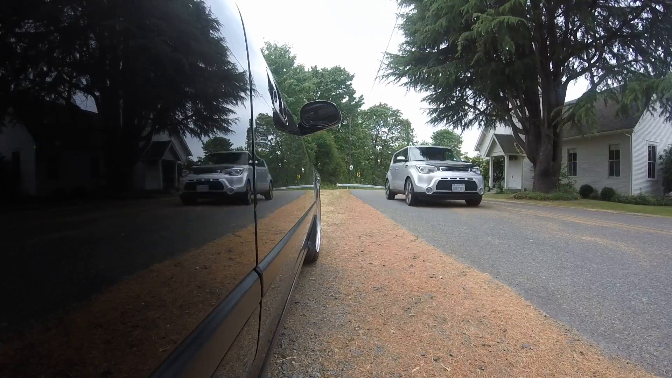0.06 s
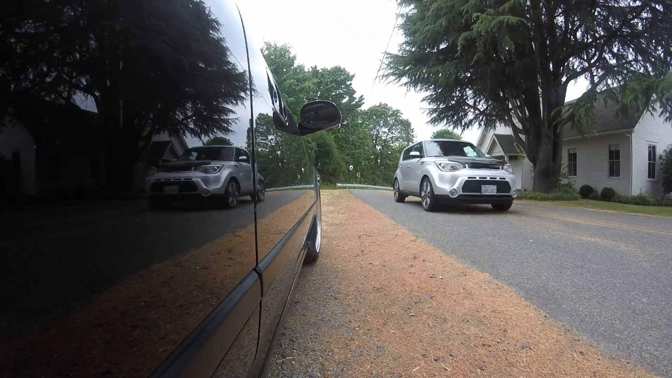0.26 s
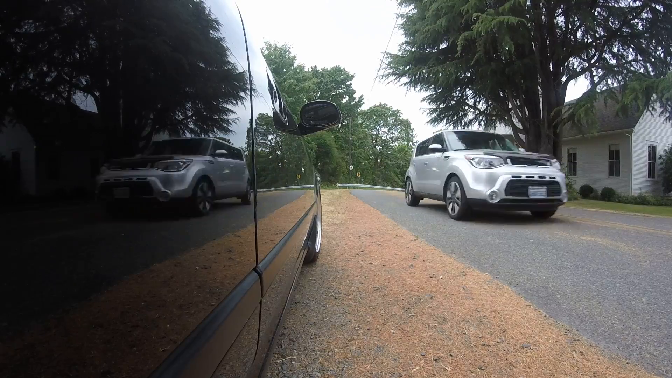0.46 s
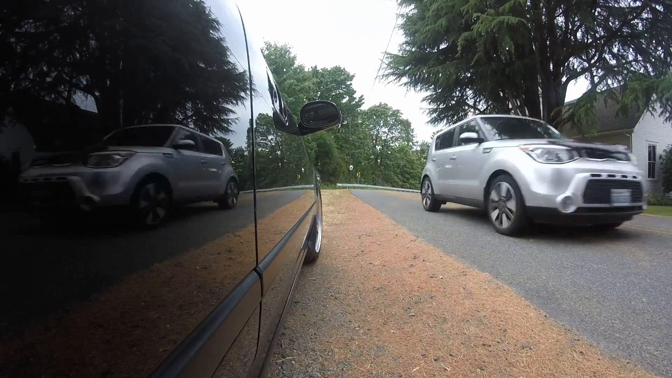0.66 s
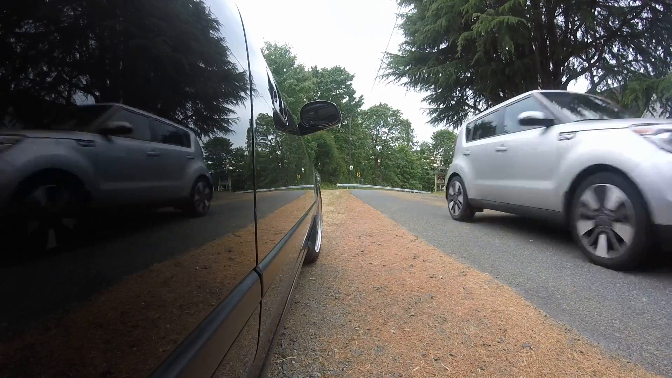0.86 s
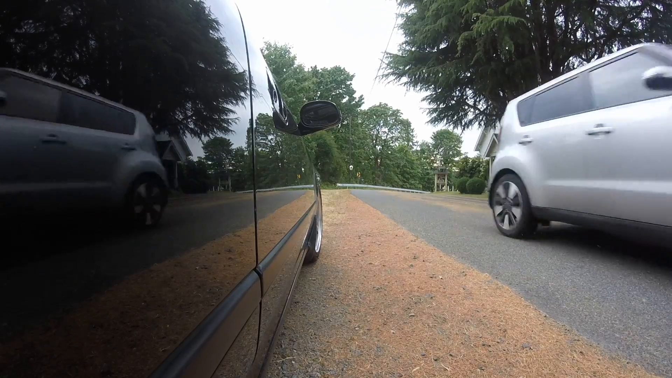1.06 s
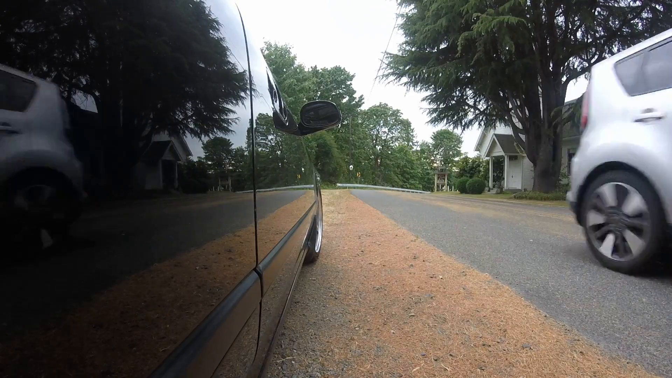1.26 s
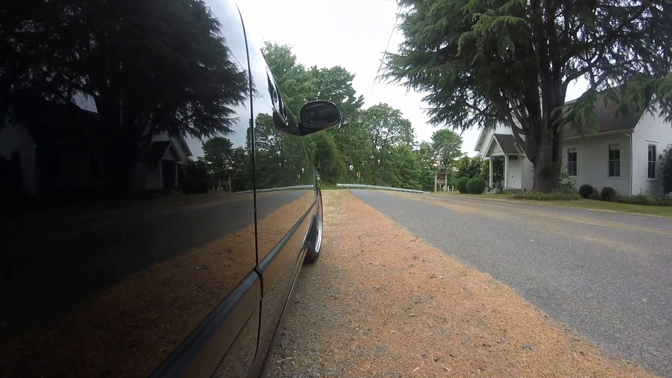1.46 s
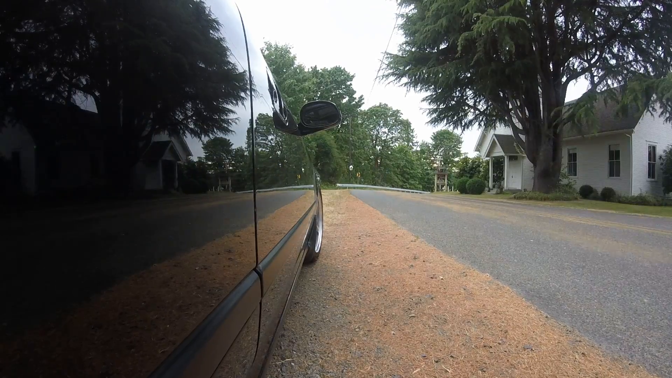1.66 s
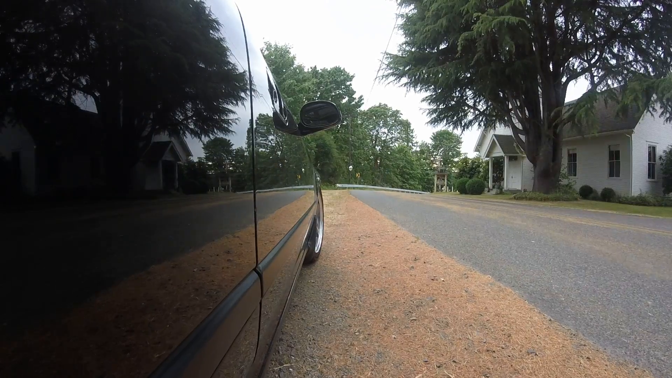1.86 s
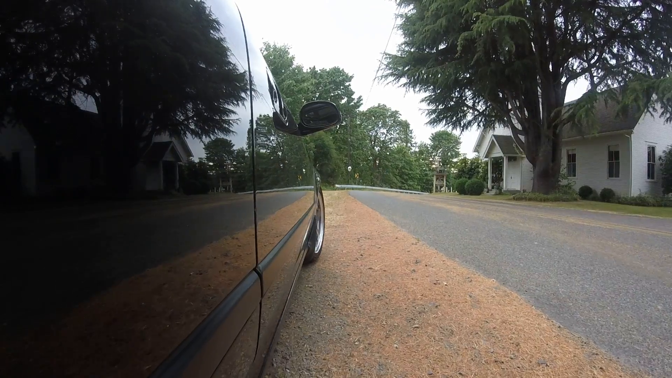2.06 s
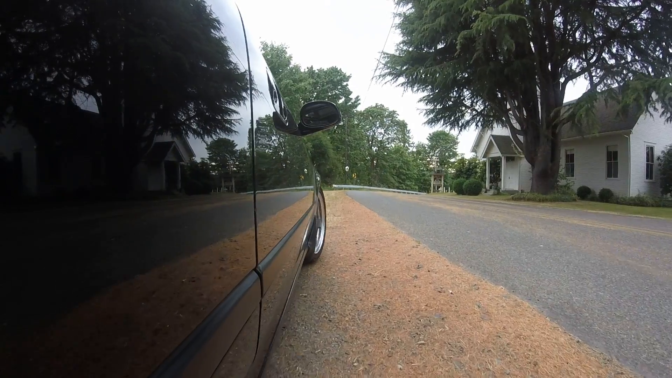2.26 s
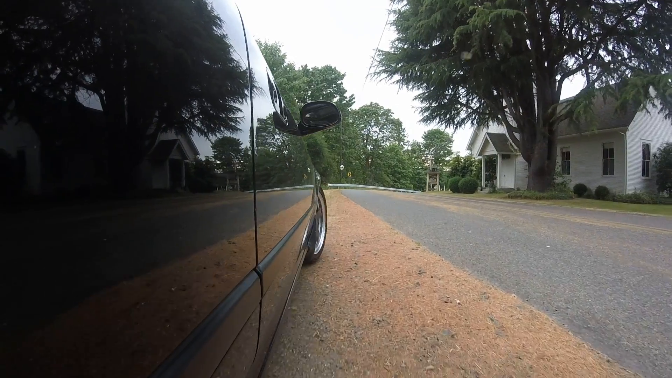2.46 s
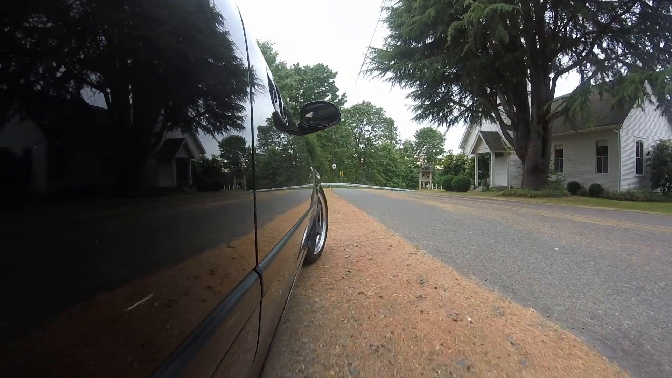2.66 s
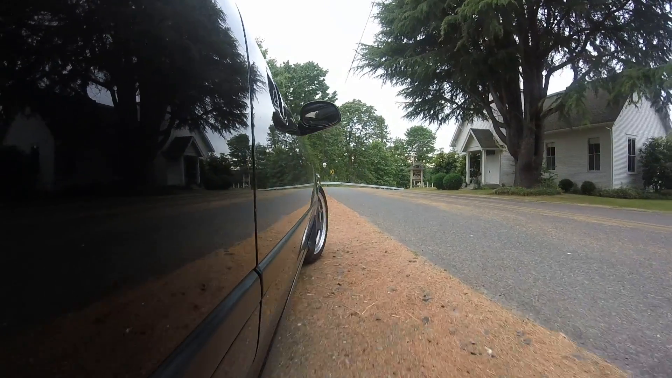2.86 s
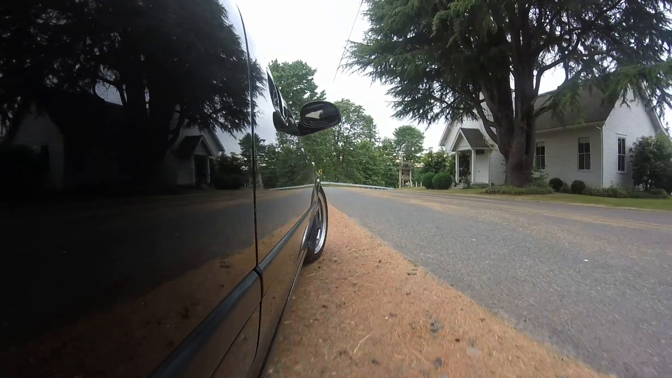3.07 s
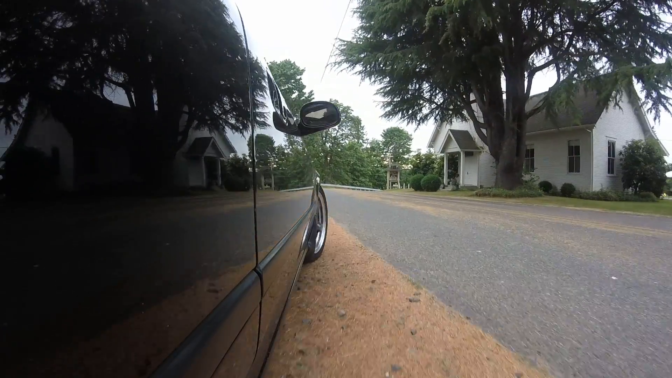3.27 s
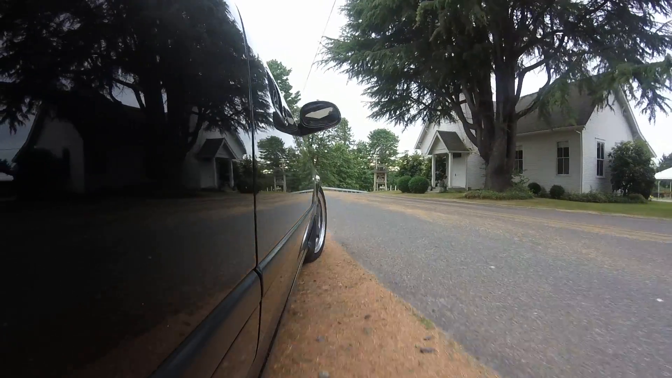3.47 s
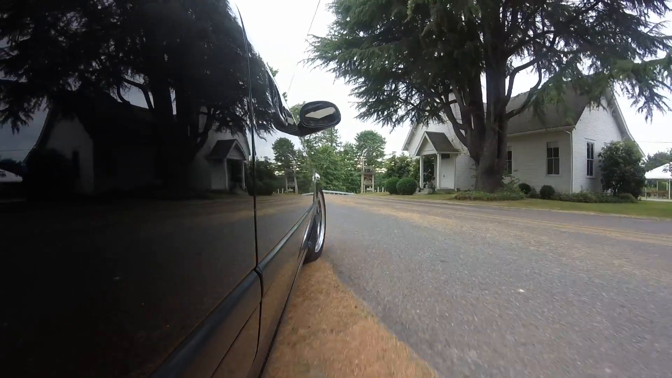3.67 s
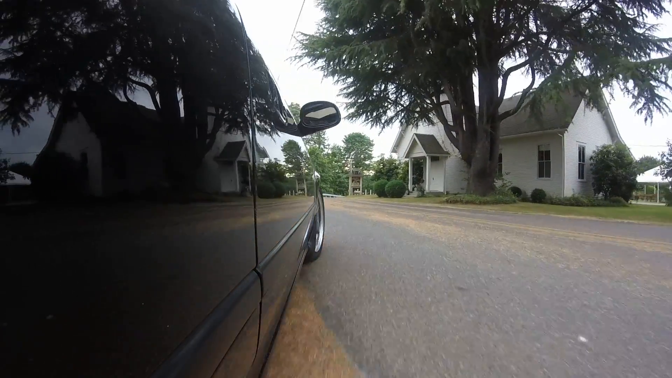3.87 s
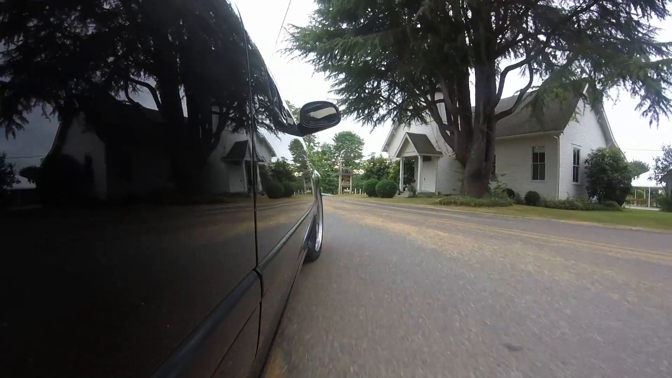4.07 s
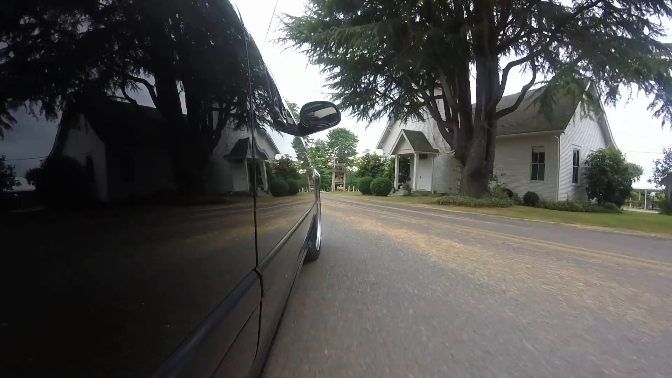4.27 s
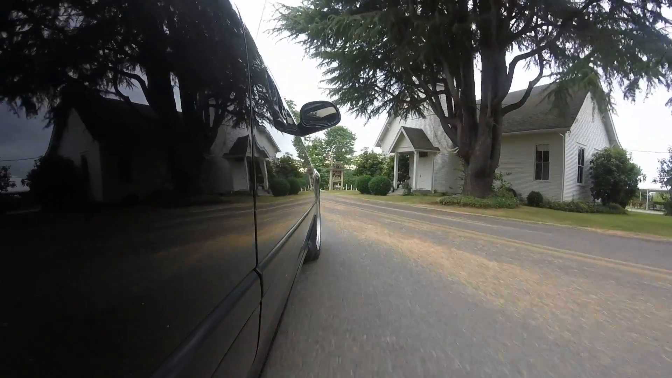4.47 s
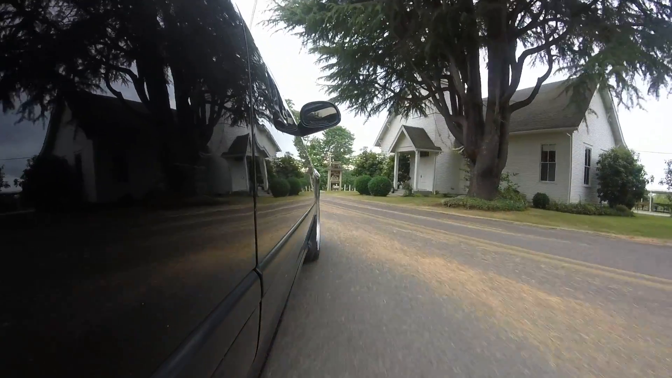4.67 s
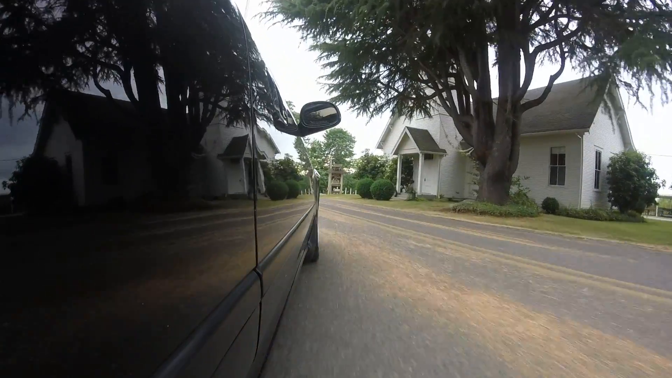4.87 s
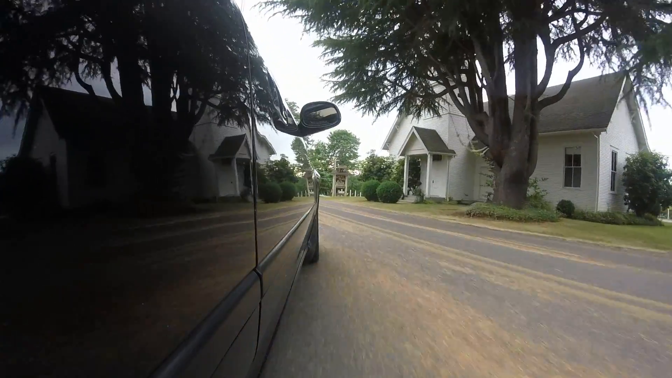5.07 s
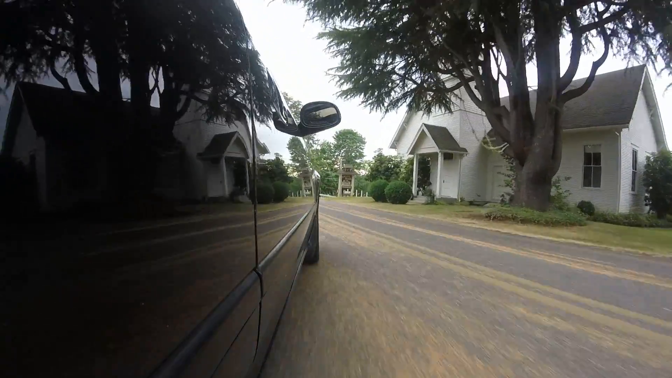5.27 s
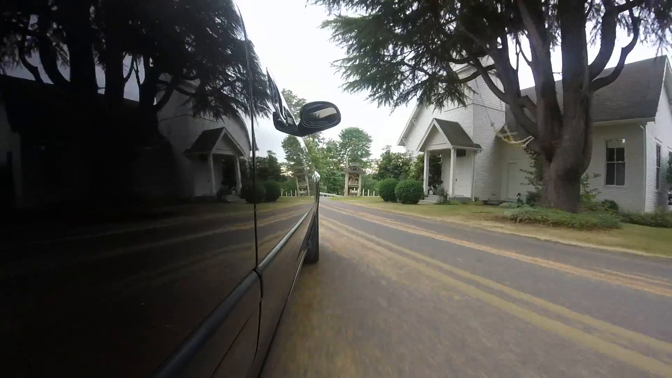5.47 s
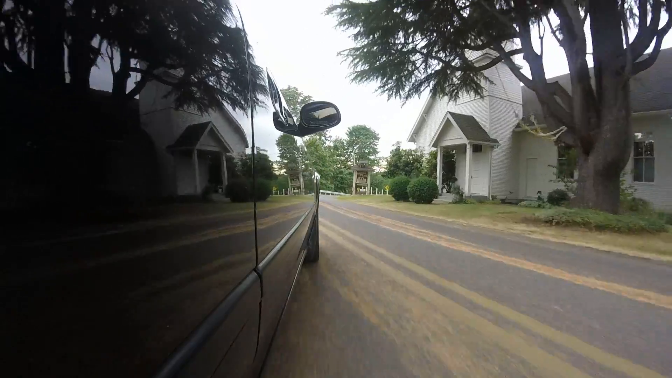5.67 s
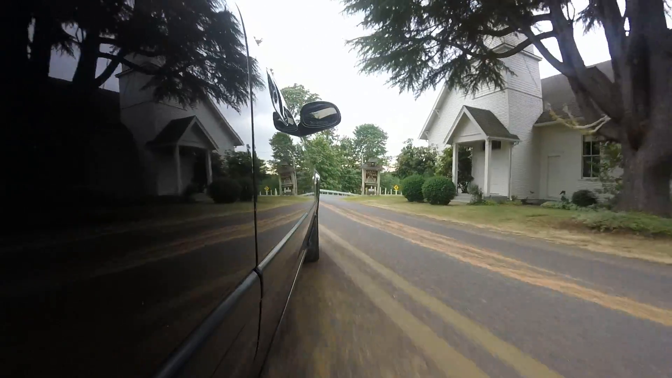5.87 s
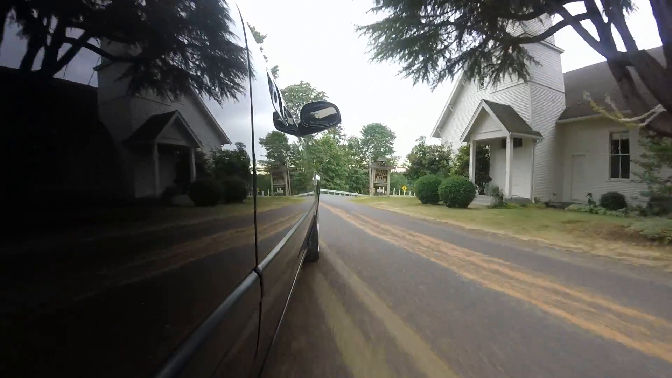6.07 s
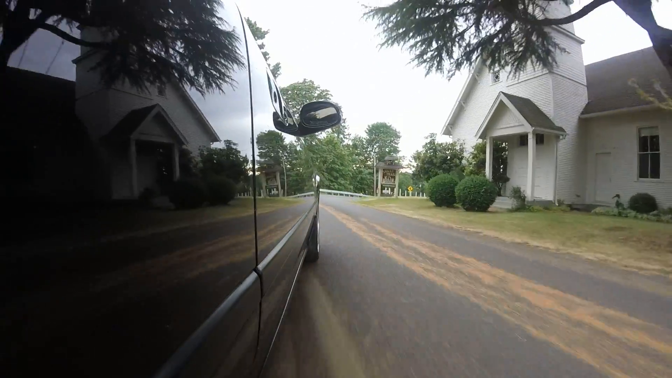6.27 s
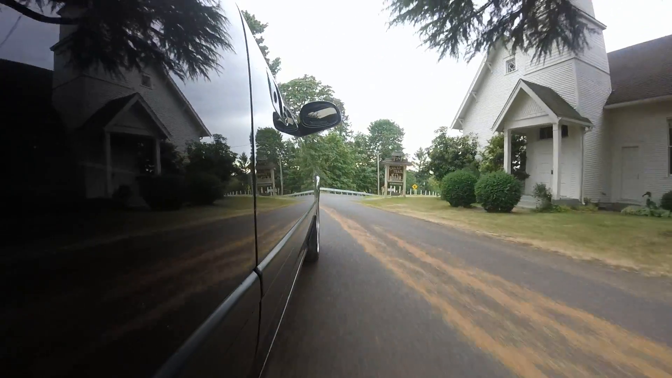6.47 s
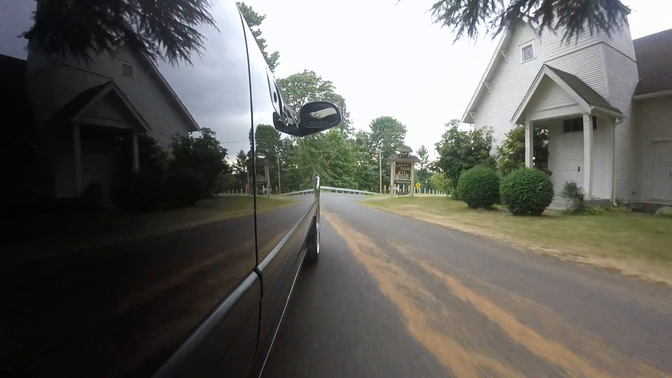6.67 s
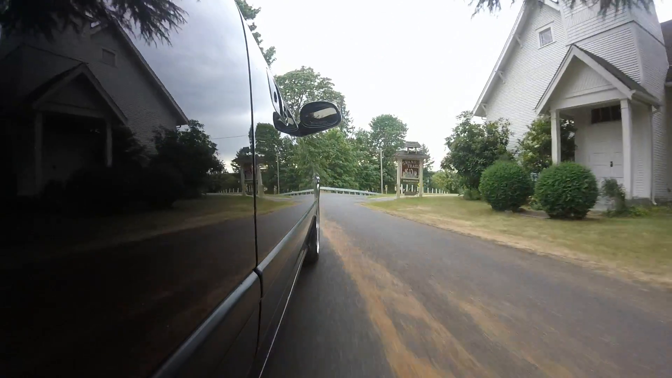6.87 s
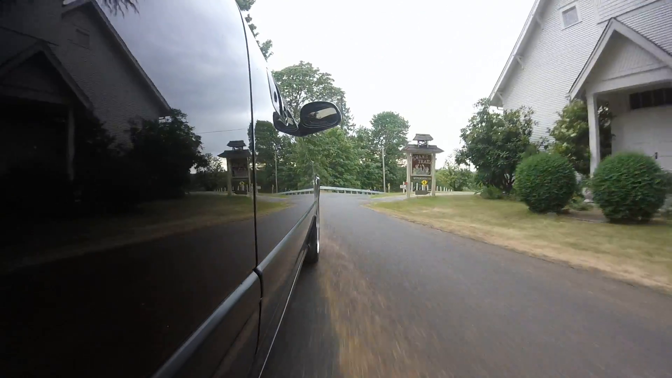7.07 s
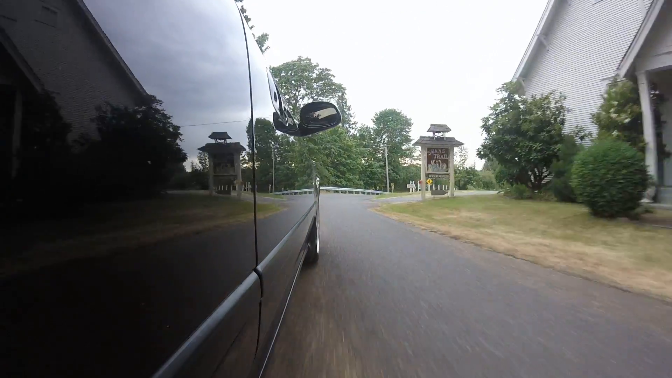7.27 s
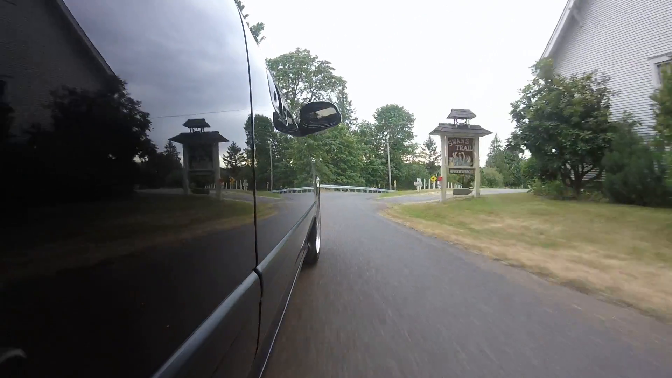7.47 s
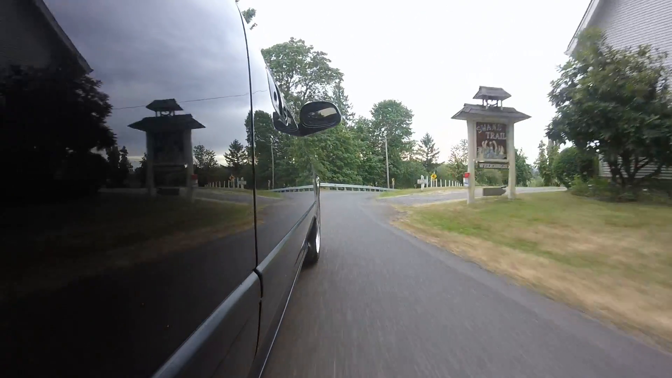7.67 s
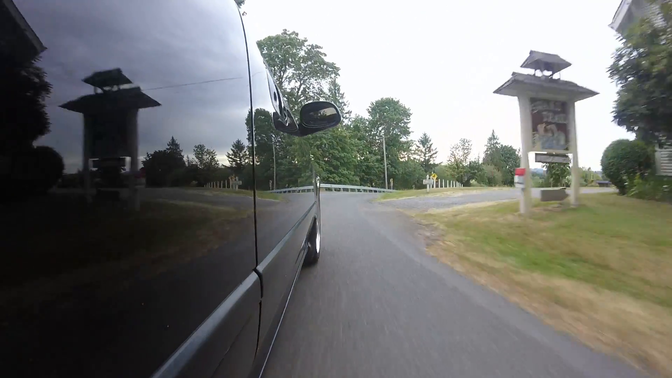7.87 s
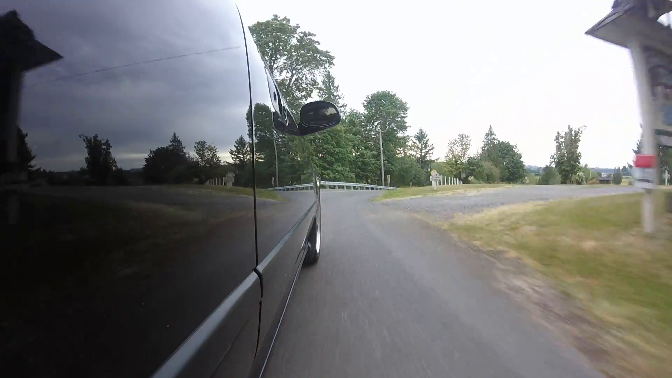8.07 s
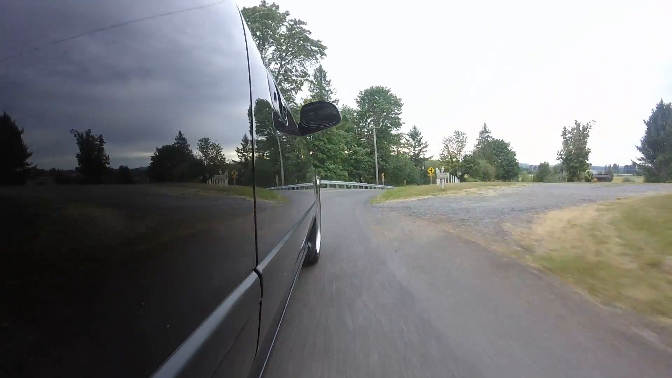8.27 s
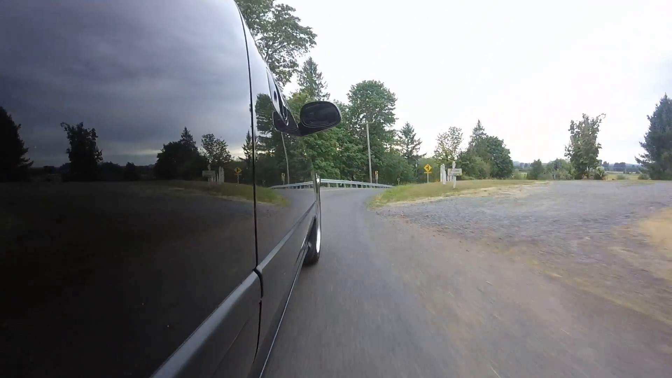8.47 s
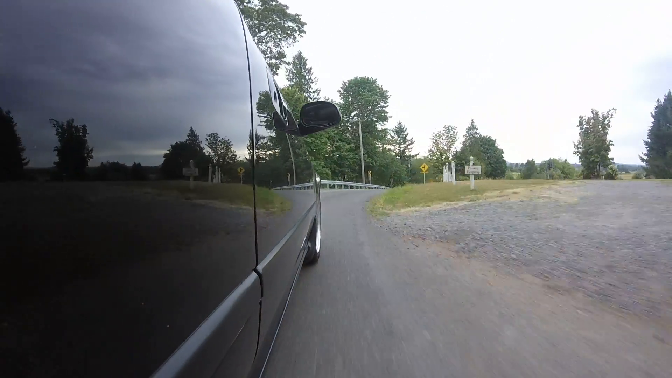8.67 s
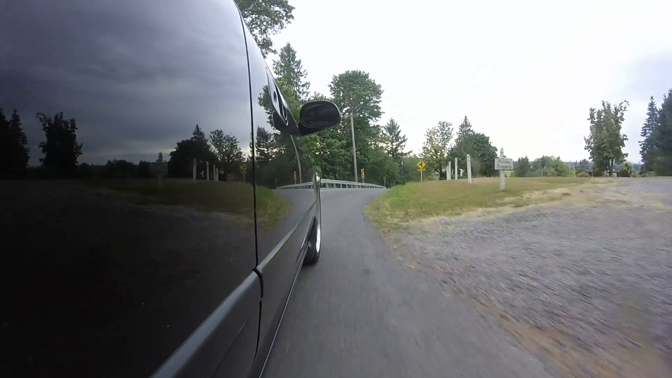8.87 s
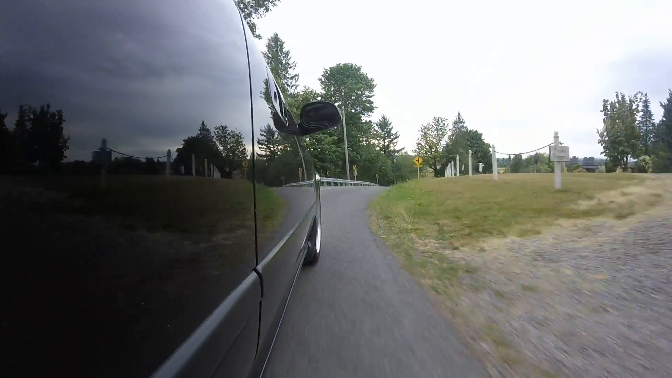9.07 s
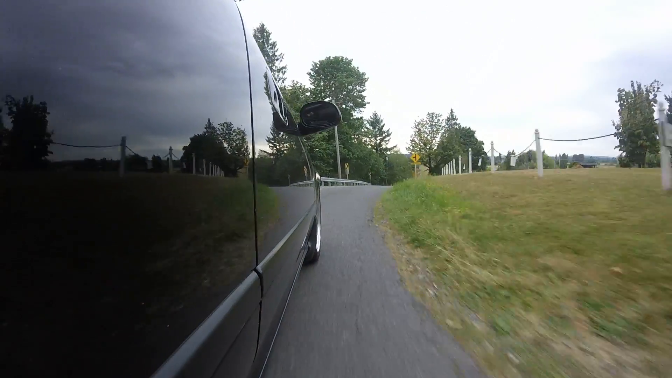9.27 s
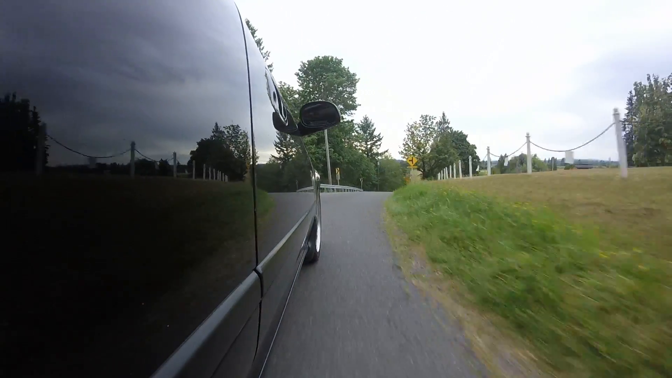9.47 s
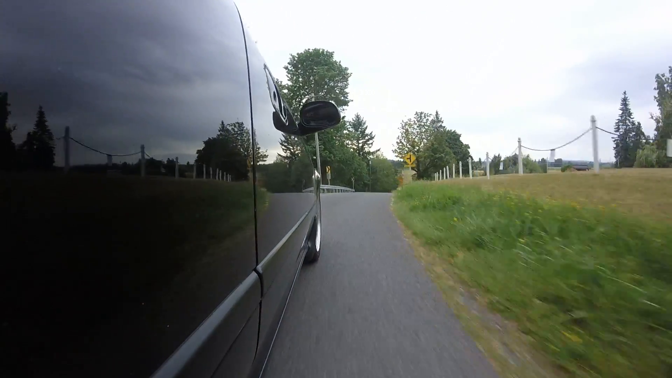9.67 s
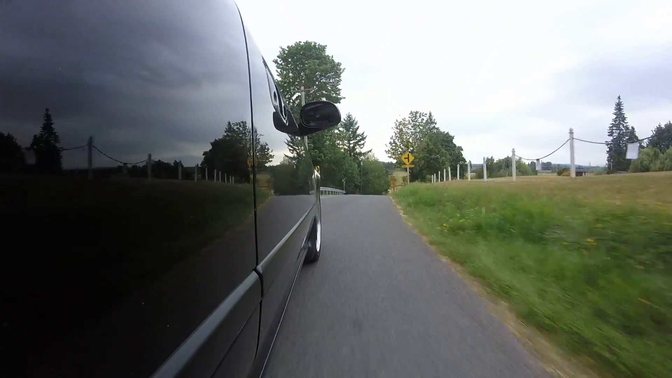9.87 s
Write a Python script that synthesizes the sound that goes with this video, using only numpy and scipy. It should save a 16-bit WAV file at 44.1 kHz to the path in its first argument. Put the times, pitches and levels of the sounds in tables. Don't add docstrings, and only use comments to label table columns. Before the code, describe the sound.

A quiet four-cylinder idle shakes a sealed case fixed to the car body while another vehicle rolls by. A quick rev follows, then slow gravelly rolling with small ringing ticks and faint whistling. The car accelerates hard, its drone swelling through panel resonances to a brief howl; the throttle lifts and wind, snaps and rattle remain over a lower hum.

```python
import sys
import numpy as np
from scipy import signal
from scipy.fft import rfft, irfft
from scipy.io import wavfile
from scipy.ndimage import uniform_filter1d, minimum_filter1d

SR = 44100
rng = np.random.default_rng(int(sys.argv[2]) if len(sys.argv) > 2 else 0)


def voltage_ratio(level):
    return 10 ** (np.asarray(level, float) / 20)


def persist_wave(psi):
    counts = np.round(np.clip(psi, -1, 1) * 32767).astype(np.int16)
    wavfile.write(sys.argv[1], SR, np.atleast_2d(counts).T)


N = 437472
TIME = np.arange(N) / SR
SLOW = np.arange(0, N, 64)


def evened(x):
    return x / np.sqrt(np.mean(x ** 2) + 1e-20)


def along(table):
    s, *columns = np.transpose(table)
    return [np.interp(TIME, s, c) for c in columns]


def coloured(x, points):
    f, db = np.transpose(points)
    hz = np.fft.rfftfreq(len(x), 1 / SR)
    curve_db = np.interp(np.log(hz + 1), np.log(f + 1), db)
    return irfft(rfft(x) * voltage_ratio(curve_db), len(x))


def band_rms(x, lo, hi):
    z = rfft(x)[int(lo * len(x) / SR):int(hi * len(x) / SR)]
    return np.sqrt(2 * np.sum(abs(z) ** 2)) / len(x)


def response(modes, hz):
    return np.sqrt(sum(voltage_ratio(2 * db) / (1 + (2 * (hz - f) / w) ** 2) ** 1.616 for f, w, db in modes))


def null(hz, null_hz, width):
    return 1 - 0.88 / (1 + (2 * (hz - null_hz) / width) ** 2)


def rung(modes):
    return irfft(rfft(rng.standard_normal(N)) * response(modes, np.fft.rfftfreq(N, 1 / SR)), N)


def drift(per_s, size=1):
    steps = rng.standard_normal(int(per_s * N / SR) + 2)
    return np.interp(np.arange(0, N, size) * per_s / SR, np.arange(len(steps)), steps)


def patchy(patch_db):
    a, b, patches = rng.standard_normal((N // 128 + 5, 257, 3)).T
    patches = uniform_filter1d(patches, size=6, axis=0)
    patches = evened(uniform_filter1d(patches, size=16, axis=1))
    return signal.istft((a + 1j * b) * voltage_ratio(patch_db * patches), nperseg=512, noverlap=384)[1][:N]


# time in seconds, firings per second in Hz.
REVS = [(0, 26.87), (1.25, 28.82), (1.43, 36.97), (1.78, 66.3), (1.93, 73.3), (2.12, 71.4), (2.4, 54.48),
        (2.6, 51.67), (2.92, 55), (3.42, 45.49), (3.67, 38.67), (3.92, 44.2), (5.06, 59.51), (5.62, 80.2),
        (6.46, 104.1), (6.8, 116.9), (7.98, 178.6), (8.12, 181.2)]
LIFT_S = REVS[-1][0]


def revs():
    after = np.maximum(TIME - LIFT_S, 0)
    hz = along(REVS)[0] - 80 * after + 8 * after ** 2
    clutch_hz, flywheel_s = 63.3, 0.12
    caught = np.where(after > 0, np.maximum(hz, clutch_hz), hz)
    return uniform_filter1d(caught, int(flywheel_s * SR), mode="nearest")


# time in seconds, level in dB.
LOAD = [(0, -41), (1.2, -37.5), (1.38, -35.5), (1.64, -26.5), (1.74, -29), (3.5, -30), (4, -29),
        (4.5, -28.5), (5, -32), (5.3, -22.5), (6.45, -22.5), (6.75, -18.5), (7.7, -18), (8.08, -17),
        (8.2, -24.5), (8.4, -23.5), (8.7, -34.5), (9.92, -32)]


def exhaust_drive():
    return along(LOAD)[0]


# centre in Hz, width in Hz, level in dB.
PIPE = [(580, 55, -30), (805, 320, -20), (940, 94, -19), (1006, 62, -12), (1725, 180, 5.5)]


def open_pipe(hz, drive_db):
    return voltage_ratio(drive_db - drive_db.max()) * response(PIPE, hz)


# dB at -22 dB of drive and 100 Hz, share of load, dB per octave of revs.
TONES = [
    (-9, 0.044, 0.4),
    (-16, 1.31, -3.5),
    (-16, 1.15, 0),
    (-21.5, 1.44, -5),
]
# centre in Hz, width in Hz, level in dB.
BODY = [(36, 7.5, -36), (67, 31, -19.5), (87.2, 7.2, -2.5), (99.2, 9.36, 4.5), (114, 14, -20),
        (145.8, 29.5, 0), (176.7, 9.2, -14), (194.2, 49, -11), (265, 9.1, -11.5), (286, 38, -17),
        (348.2, 15, -5.5), (400, 14, -18.5), (420.5, 49, -8), (509.4, 14.25, -8)]
# centre in Hz, width in Hz.
NULLS = [(123, 7.8), (171.5, 4.9), (228, 13), (315, 10), (366, 23), (402, 9.3), (462, 18), (491, 5.5),
         (538, 13)]
OWN_NULLS = {1: [(61, 4.3)], 3: [(91, 21)], 4: [(64, 8.7), (104, 7.3)]}


def tones(hz, turns, load_db):
    f, load, out = hz[SLOW], load_db[SLOW], 0
    coasting = SLOW / SR > LIFT_S
    first = np.where(coasting, null(f, 85.3, 4), 1)
    second = uniform_filter1d(np.where(coasting, voltage_ratio(6), null(f, 169, 8)), size=60)
    for k, (db, share, octave_db) in enumerate(TONES, 1):
        path = response(BODY, k * f) * np.prod([null(k * f, *row) for row in NULLS], axis=0)
        path *= np.prod([null(f, *row) for row in OWN_NULLS.get(k, [])], axis=0)
        path = path * {1: first, 2: second}.get(k, 1) + open_pipe(k * f, load)
        size = path * voltage_ratio(db + share * load + octave_db * np.log2(f / 100))
        wobble = np.sqrt(2) * voltage_ratio(drift(30))
        tone = np.sin(2 * np.pi * (k * turns + rng.random()))
        out = out + np.interp(np.arange(N), SLOW, size) * wobble * tone
    return out


SHARES_DB = [5, -5.5, -2, 1.5, 2.5, 0.5]
# centre in Hz, width in Hz, level in dB.
PANELS = [(35, 14, -3.5), (60, 19, -11.5), (91.5, 11, 1), (146, 33, 2.5), (196, 33, -3.5), (259, 22, -6.5),
          (342.4, 27, -10), (424.3, 44, -9), (507.7, 13, -6)]
# centre in Hz, width in Hz, level in dB.
HOWL_MODES = [(1524, 48, 1.5), (1590, 84, 0.5), (1803, 47, -4)]


def engine(hz, turns, drive_db):
    out = np.zeros(N)
    f, drive = hz[SLOW], drive_db[SLOW]
    extra_db = dict(zip((.5, 1.5, 2.5, 3.5, 5, 6), SHARES_DB))
    howl_s, howl_length_s, howl_db = 7.92, 0.088, 5.5
    howl = voltage_ratio(howl_db) * np.exp(-((SLOW / SR - howl_s) / howl_length_s) ** 2)
    for k in (.5, 1.5, 2.5, 3.5, *np.arange(4.5, 13, .5)):
        uneven_db = -1.5 - 250 / f * (k > 1)
        db = drive - 1.42 * k + 2 * (k % 1) * uneven_db + extra_db.get(k, 0)
        db -= 130 / f * max(k - 6, 0)
        path = response(PANELS, k * f) + open_pipe(k * f, 0.98 * drive)
        path = path + howl * response(HOWL_MODES, k * f)
        wander_db = 2.5 * drift(9, size=64) + 2 * drift(40, size=64)
        size = np.interp(np.arange(N), SLOW, voltage_ratio(db + wander_db) * path)
        jitter = (0.4 + 0.07 * k) * drift(22)
        out += size * np.sin(2 * np.pi * (k * turns + rng.random()) + jitter)
    return out


# time in seconds, speed in metres per second.
AIR = [(0, 4.4), (.6, 5.2), (2, 5.02), (4.7, 5.9), (5.4, 7), (6.2, 6.9), (6.6, 8.02), (7.1, 8.67),
       (8, 12.25), (8.45, 14.47), (8.7, 13.64), (9.2, 14.83), (9.4, 12.34), (9.62, 15), (9.92, 15.6)]
# dB at cruise, share of air, share of load, share of revs, resting level in dB.
LAWS = [
    (-19, 0.44, 0.045, 1, -51),
    (-30, 0.5, 0.22, 0.55, -62),
    (-31.5, 0.58, 0.71, 0.55, -55),
    (-28.5, 1.173, 0.11, 0.5, -84.5),
    (-55.5, 1.03, 0.12, 0.82, -79),
]


def levels(hz, load_db):
    cruise_m_s, air_power = 14.4, 3
    air_db = 20 * air_power * np.log10(along(AIR)[0][SLOW] / cruise_m_s)
    revs_db = 20 * np.log10(hz[SLOW] / 100)
    out = []
    for db, air, load, rev, rest_db in LAWS:
        driven_db = db + air * air_db + load * load_db[SLOW] + rev * revs_db
        power = voltage_ratio(2 * driven_db) + voltage_ratio(2 * rest_db)
        out.append(np.interp(np.arange(N), SLOW, 10 * np.log10(power)))
    return out


# frequency in Hz, level in dB.
HISS = [(350, -47.5), (600, -28.5), (678, -34.5), (820, -18.5), (1090, -24.5), (1300, -15), (1620, 1.5),
        (1930, -15.5), (2220, -7), (2570, -33.5), (3770, -20), (4940, -39), (6230, -52), (6760, -36),
        (15500, -73)]


def hiss(level_db, turns):
    puffs = 1 + 0.27 * np.cos(2 * np.pi * turns)
    noise = evened(coloured(puffs * patchy(patch_db=1), HISS))
    return voltage_ratio(level_db - 3) * noise / band_rms(noise, 1300, 1900)


# frequency in Hz, level in dB.
WIND = [(350, -34.5), (600, -17), (855, -13), (1230, -7.5), (1600, 3), (1910, -6.5), (2540, 9), (2750, 0.5),
        (3070, 7), (3820, 1.5), (4680, -32), (6230, -22), (6850, -35.5), (9370, -44), (15500, -52)]


def wind(level_db):
    noise = coloured(patchy(patch_db=1) * voltage_ratio(drift(60)), WIND)
    noise += 0.23 * noise.std() * evened(rung([(2530, 48, 0)]))
    return voltage_ratio(level_db) * noise / band_rms(noise, 2200, 4200)


def flecks(wind_db):
    gusts = voltage_ratio(5 * drift(90) + 1.5 * drift(18))
    level_db = -43 + 1.2 * (wind_db - wind_db.max())
    return voltage_ratio(level_db) * evened(gusts * rung([(6135, 310, 0)]))


# frequency in Hz, level in dB.
BUZZ = [(1060, -28), (1800, -2.5), (2260, -5.5), (2520, -13), (2970, -1.5), (3930, -5), (6080, -11.5),
        (6900, -14), (8700, -13.5), (11000, -27), (15800, -43.5)]


def plastic(noise):
    return coloured(noise, BUZZ)


# start in seconds, end in seconds, level in dB.
CHATTERS = [(6.315, 6.512, -52), (6.516, 6.537, -53), (8.135, 8.33, -53), (8.88, 8.888, -42.5),
            (9.089, 9.107, -51), (9.237, 9.335, -53.5)]


def buzz(fizz_db, turns):
    spells = sum(voltage_ratio(db) * np.clip(np.minimum(TIME - a, b - TIME) * 300, 0, 1) for a, b, db in CHATTERS)
    first, second = voltage_ratio(np.array([[1], [2.5]]) * rng.standard_normal((2, 2000)))[:, turns.astype(int)]
    ticks = evened(first * np.exp(-((turns % 1 - .1) / .045) ** 2))
    low = ticks * evened(rung([(4300, 1400, -3), (5900, 900, 0)]))
    bursts = .35 + second * np.exp(-((turns % 1 - .6) / .12) ** 2)
    noise = plastic(rng.standard_normal(N))
    noise /= band_rms(noise, 7000, 14000)
    fizz = voltage_ratio(fizz_db - 1 + 1.5 * drift(70) + 2.5 * np.maximum(drift(45), 0))
    ring = 3.4 * evened(rung([(2516, 130, 0)]))
    return fizz * noise + spells * (evened(bursts) * noise + 0.7 * low + ring)


# time in seconds, peak level in dB.
SNAPS = [(6.5234, -32.5), (6.6066, -26), (6.6358, -42.5), (6.6484, -38), (6.6593, -23.5), (6.72, -43),
         (6.8515, -39.5), (7.1325, -42), (7.182, -38), (7.2186, -41), (7.2734, -37.5), (7.4767, -44.5),
         (7.5064, -37), (7.5464, -39.5), (7.7266, -34.5), (7.8795, -30.5), (8.0197, -24), (8.1836, -26.5),
         (8.5734, -29.5), (8.6504, -29), (8.7554, -32.5), (8.8846, -30), (8.9319, -33), (8.9962, -32),
         (9.0928, -34.5), (9.145, -35.5), (9.1823, -35), (9.2434, -27.5), (9.2848, -21), (9.315, -30),
         (9.3578, -37), (9.4544, -37), (9.5523, -39), (9.5888, -32), (9.744, -27), (9.7814, -33.5),
         (9.837, -32.5), (9.8617, -29.5),
         (2.88, -48), (3.433, -50), (4.067, -54), (3.4462, -65), (4.1923, -52), (4.278, -56), (4.7903, -50),
        (6.5463, -46), (6.566, -50), (6.594, -54), (8.147, -42), (8.222, -33.5), (8.311, -36.5),
        (8.786, -39.5), (9.257, -31), (9.325, -33), (9.873, -41)]


def snaps():
    out, t = np.zeros(N + 1024), np.arange(-512, 512) / SR
    from_s = 8.8
    faint = [(from_s + a * (N / SR - from_s), -45 + 8 * (b - .5)) for a, b in rng.random((24, 2))]
    rows = SNAPS + faint
    shape = np.exp(-((t - .0012) / .0007) ** 2) + .2 * np.exp(-((t - .002) / .003) ** 2)
    for (s, db), noise in zip(rows, rng.standard_normal((len(rows), 1024))):
        body = plastic(noise)
        click = (np.diff(body, prepend=0) + 0.55 * body) * shape
        out[round(s * SR):][:1024] += voltage_ratio(db + 5) * click / abs(click).max()
    return out[512:][:N]


# time in seconds, peak level in dB, tilt in dB per octave.
STONES = [(1.3644, -52, -10), (1.6234, -54, -8), (1.6884, -53, -4), (2.013, -41, -13), (2.176, -42, -9),
          (2.1955, -39, -13), (2.2214, -48, -6), (2.2842, -42, -3), (2.5556, -47, 0), (2.6352, -45, -7),
          (2.8129, -36, -11), (2.853, -44, -17), (2.934, -35, -14.5), (2.9457, -34.5, -12),
          (3.0086, -40, -10), (3.056, -37.5, -11), (3.102, -42, -13), (3.3115, -24.5, -5.5),
          (3.3967, -39.5, -7), (3.4298, -45, 6), (3.5004, -38, -9), (3.5657, -41, -8), (3.686, -51, -5),
          (3.708, -43, -9), (3.722, -45, 1), (3.8541, -42, -8), (3.9117, -39.5, 2), (3.9394, -43.5, -7),
          (3.979, -42, -1), (4.0127, -41, -9), (4.0678, -36, -6), (4.153, -42, -6), (4.1954, -37.5, 0),
          (4.2476, -41, -9), (4.2735, -39, -6), (4.369, -46, -6), (4.3983, -43, -5), (4.591, -44.5, 0),
          (4.6164, -43, -10)]
# centre in Hz, width in Hz, level in dB.
CASE = [(1635, 126, 25.5), (2250, 280, 18.5), (2500, 150, -10), (3070, 620, 14.5), (3830, 570, 3.5),
        (6100, 300, -34)]


def stones():
    out, t = np.zeros(N + 4000), np.arange(4000) / SR
    hz = np.fft.rfftfreq(4000, 1 / SR)
    case = response(CASE, hz) + 0.12 / (1 + (hz / 1200) ** 4)
    case = case * (hz > 450) / (1 + (hz / 5500) ** 4)
    for (s, db, tilt_db), noise in zip(STONES, rng.standard_normal((len(STONES), 4000))):
        t60 = 0.027 * (1 + 18 * voltage_ratio(db))
        crack = voltage_ratio(-60 * np.maximum(t - 0.088 * t60, 0) / t60)
        shape = np.minimum(t / 0.0024, 1) * (crack + 0.43 * voltage_ratio(-22 * t / t60))
        tilt = voltage_ratio(tilt_db * np.log2(hz / 1600 + 0.14))
        tick = irfft(rfft(noise) * case * tilt) * shape
        out[round(s * SR):][:4000] += voltage_ratio(db + 5) * tick / abs(tick).max()
    return out[:N]


# time in seconds, level in dB, length in seconds.
THUDS = [(4.155, -40.5, .022), (4.33, -45, .03), (4.2, -53, .05), (2.3, -50, .05)]
# centre in Hz, width in Hz, level in dB.
THUD_MODES = [(350, 50, -9.5), (425, 50, -3), (494, 28, -4.5)]


def thuds():
    knocks = sum(voltage_ratio(db) * np.exp(-((TIME - s) / length) ** 2) for s, db, length in THUDS)
    return evened(rung(THUD_MODES)) * knocks


# centre in Hz, width in Hz, level in dB.
BOOMS = [(33, 5, 0), (55, 13, -12), (94.56, 5.4, -3), (142.8, 3.6, -10.5), (90.5, 69.4, -19)]
# time in seconds, dB of extra boom (below 0: less), length in seconds.
SWELLS = [(0.831, 9.5, 0.17), (1.408, 22, 0.053), (2.3, 5.5, 0.12), (3.548, 16.5, 0.46), (4.694, 8.5, .15),
          (5.143, 8, 0.29), (6.06, 3, 0.31), (6.597, -9.5, 0.18), (7.2, -3.5, 0.13), (8.11, -7.5, 0.31),
          (8.7, -5, 0.19), (9.314, -7.5, 0.2), (9.65, 6, 0.47)]


def boom(level_db):
    swells_db = sum(db * np.exp(-((TIME - s) / length) ** 2) for s, db, length in SWELLS)
    low = rung(BOOMS)
    return voltage_ratio(level_db + swells_db - 2) * low / band_rms(low, 22, 44)


# frequency in Hz, level in dB.
RUMBLE = [(88, -28), (150, -11.5), (170, -21), (206, -10), (295, -10.5), (335, -8), (383, -6.5),
          (425, -4.5), (619, -27.5), (900, -34), (1170, -62), (1980, -120)]


def rumble(level_db):
    low = coloured(rng.standard_normal(N), RUMBLE)
    return voltage_ratio(level_db - 3) * low / band_rms(low, 220, 560)


# start in seconds, end in seconds, level in dB, swell in seconds.
SONGS = [(0.024, 0.284, -49, 0.088), (0.333, 0.608, -42.5, 0.25), (1.15, 1.514, -42.5, 0.24),
         (1.496, 1.826, -43, 0.24), (2.2, 2.501, -66, 0.12), (2.698, 3.21, -45.5, 0.21),
         (3.74, 4.685, -48, 0.14), (5.002, 5.198, -65, 0.35)]
# centre in Hz, width in Hz, level in dB.
WHISTLE = [(1612, 40, 0), (1730, 40, -7)]


def whistle():
    spells = 0
    for a, b, db, swell in SONGS:
        dying = np.exp(-np.maximum(TIME - b, 0) / 0.06)
        spells = spells + voltage_ratio(db) * np.clip((TIME - a) / swell, 0, 1) ** 1.03 * dying
    return spells * voltage_ratio(-2.5 + drift(25)) * evened(rung(WHISTLE))


# time in seconds, pitch in Hz, level in dB.
PASSING = [(0.0, 86.8, -55), (0.25, 105.2, -50), (0.33, 102.4, -63), (0.516, 83, -64), (0.7, 88.7, -35)]
# pitch in Hz, level in dB, end in seconds.
HUMS = [(163, -45.5, 0.65), (376, -66, 1.46)]
# centre in Hz, width in Hz, level in dB.
TYRES = [(3720, 300, -4), (6100, 400, -5)]


def passing():
    hz, db = along(PASSING)
    fade = np.clip((PASSING[-1][0] - TIME) / 0.035, 0, 1)
    hum = voltage_ratio(db) * fade * np.sin(2 * np.pi * np.cumsum(hz) / SR)
    for hum_hz, hum_db, end in HUMS:
        size = voltage_ratio(hum_db + 2.1 * drift(12)) * np.clip((end - TIME) / .1, 0, 1)
        hum += size * np.sin(2 * np.pi * hum_hz * TIME + 1.1 * drift(8))
    nearest_s, pass_s = 0.92, 0.61
    nearness = np.exp(-((TIME - nearest_s) / pass_s) ** 2)
    return np.sqrt(2) * hum + voltage_ratio(-69.5) * evened(rung(TYRES)) * nearness


# frequency in Hz, level in dB.
QUIET = [(290, -32), (500, -4.5), (686, -3.5), (792, -3.5), (827, -4.5), (1150, -5), (1240, -6), (1600, 0),
         (2040, -18), (3680, -16.5), (4910, -22), (6180, -19.5), (10500, -28.5), (15500, -36)]


def quiet():
    return voltage_ratio(-59.5) * evened(coloured(rng.standard_normal(N), QUIET))


def scene():
    hz, drive_db = revs(), exhaust_drive()
    load_db = drive_db + 22
    turns = np.cumsum(hz) / SR
    boom_db, rumble_db, hiss_db, wind_db, fizz_db = levels(hz, load_db)
    motor = tones(hz, turns, load_db) + engine(hz, turns, drive_db)
    air = hiss(hiss_db, turns) + wind(wind_db) + flecks(wind_db)
    case = buzz(fizz_db, turns) + snaps() + whistle()
    road = stones() + thuds() + boom(boom_db) + rumble(rumble_db)
    return (motor + air + case + road + passing() + quiet())[None]


def band_limit(x):
    return signal.sosfilt(signal.butter(12, 15750, fs=SR, output="sos"), x)


def record(dry):
    peak = -minimum_filter1d(-abs(dry), size=1323)
    dry = dry * uniform_filter1d(np.minimum(0.76 / peak.clip(1e-3), 1), size=1323)
    rolled = signal.sosfilt(signal.butter(4, 15000, fs=SR, output="sos"), dry)
    return band_limit(rolled)


dry = scene()
out = record(dry)
persist_wave(out)
```